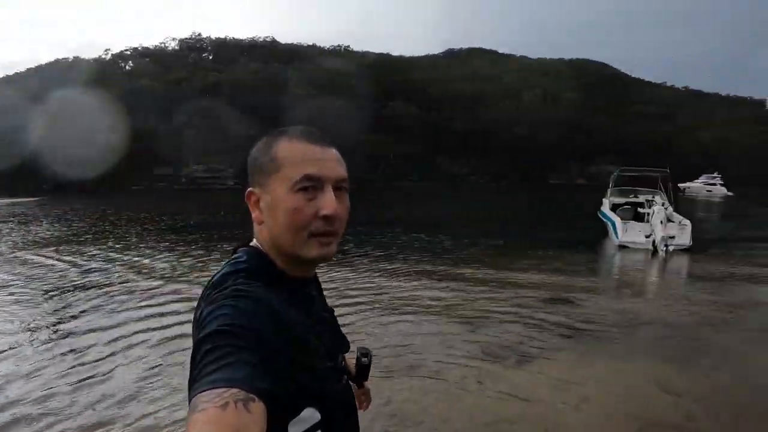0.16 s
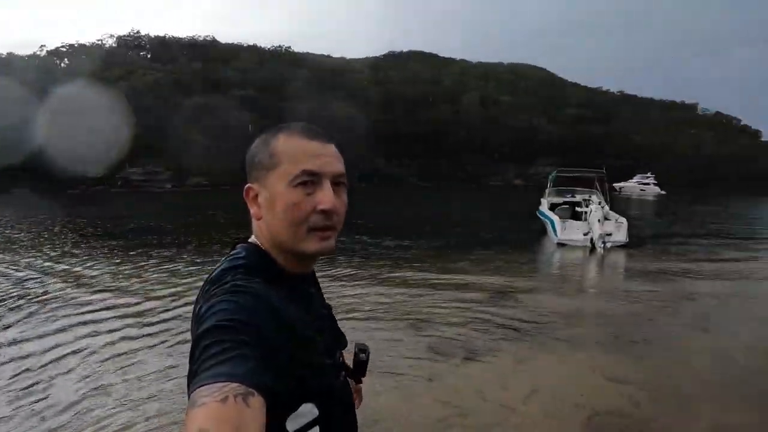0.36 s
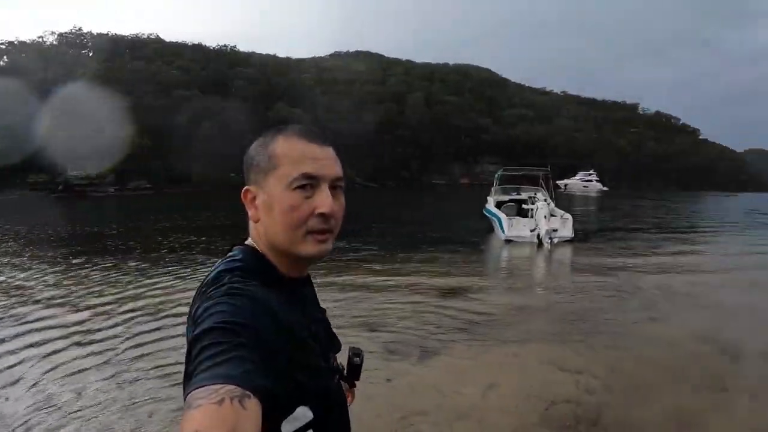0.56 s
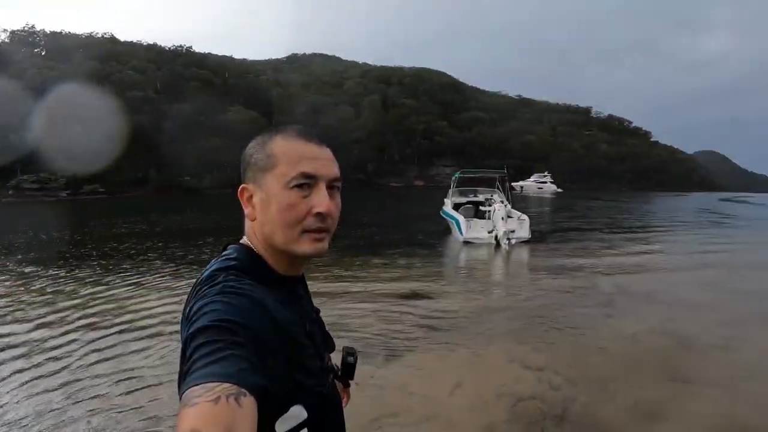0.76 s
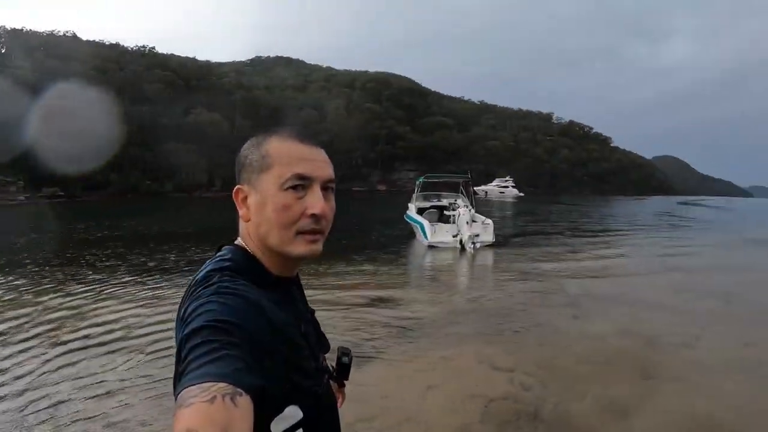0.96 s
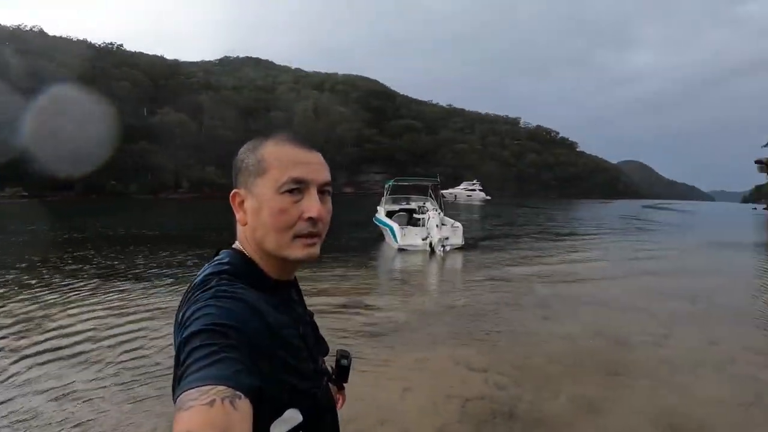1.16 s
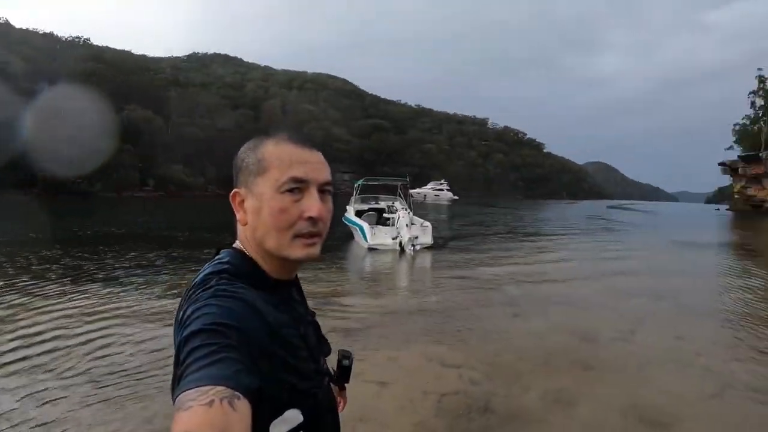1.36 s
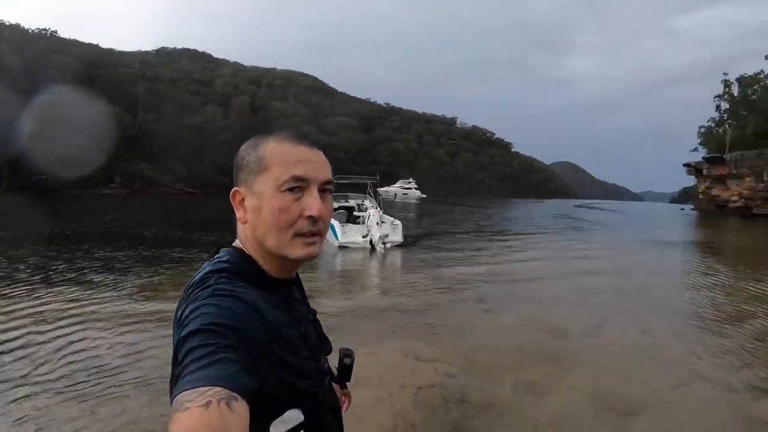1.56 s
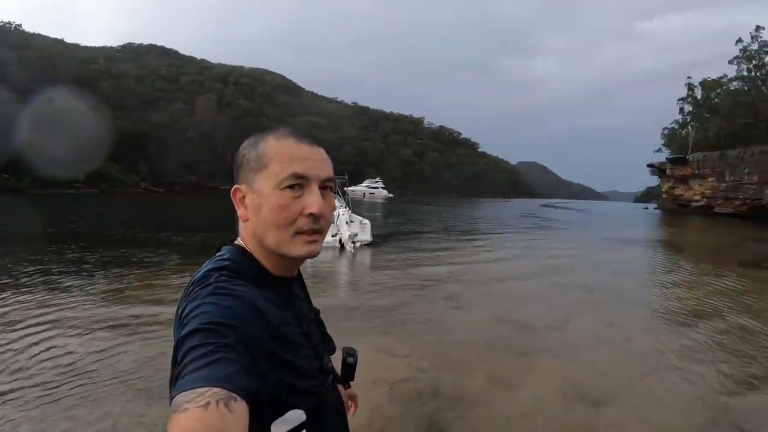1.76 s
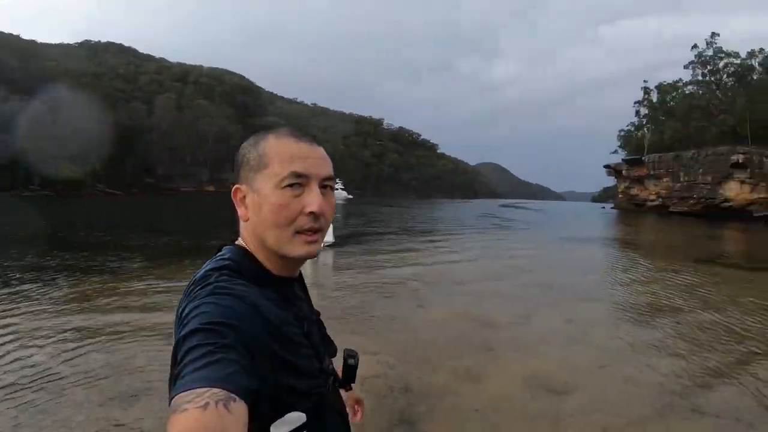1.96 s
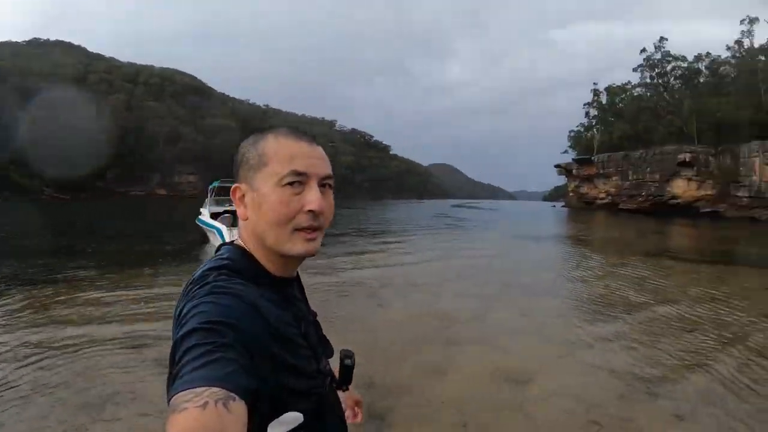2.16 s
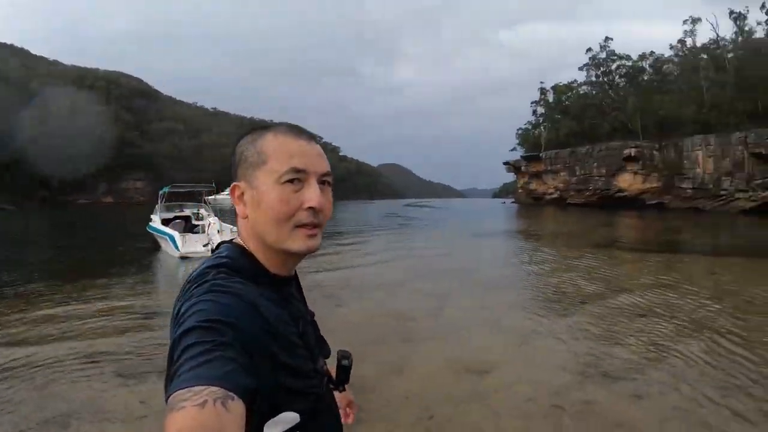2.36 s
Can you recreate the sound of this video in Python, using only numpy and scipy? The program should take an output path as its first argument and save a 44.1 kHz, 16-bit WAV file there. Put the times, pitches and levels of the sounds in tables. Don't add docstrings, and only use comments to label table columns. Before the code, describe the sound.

Close handheld microphone in a calm bay: bubbly water stir, a heavy wind knock with brief rattle, a quiet lull, a sharp splashy step with plops and ticks, then low wind bumps and last drops.

```python
import sys
import numpy as np
from scipy import signal
from scipy.io import wavfile
from scipy.ndimage import uniform_filter1d

SR = 44100
rng = np.random.default_rng(int(sys.argv[2]) if len(sys.argv) > 2 else 0)


def attenuation_scalar(level_db):
    decades = np.asarray(level_db, float) / 20
    return 10 ** decades


def output_pcm(signal):
    pcm = np.clip(np.atleast_2d(signal).T, -1, 1) * 32767
    wavfile.write(sys.argv[1], SR, np.round(pcm).astype(np.int16))


N = 110250

# (frequency [Hz], level [dB])
HUSH_SPECTRUM = [(59, -27.5), (100, 8), (205, -7.5), (825, -20.5), (976, -16.5), (3180, -25), (5170, -36.5),
                 (7560, -27.5), (15500, -49.5)]
# (frequency [Hz], left-right likeness [0-1])
HUSH_LIKENESS = [(100, 0.89), (400, 0.83), (3000, 0.13)]
# (frequency [Hz], left over right [dB])
HUSH_BALANCE = [(200, -0.5), (1000, -0.5), (5000, 5)]
# (time [s], level [dB])
STIR = [(0, -33), (.17, -35), (.2, -43), (.33, -49), (.42, -62), (1.2, -62.5), (1.27, -47), (1.37, -47),
        (1.62, -48), (1.68, -56.5), (2.27, -63.5), (2.4, -55.5), (2.5, -47)]
# (frequency [Hz], level [dB])
SWARM_SPECTRUM = [(240, -53), (400, -33), (588, -2.5), (1310, -0.5), (2520, -5), (4800, -13), (6240, -48),
                  (10600, -120)]
SPRAY_SPECTRUM = [(1470, -41), (2500, 4), (3070, -17), (4140, 8), (5040, -27), (6540, 3), (9800, -6),
                  (13700, -12), (15500, -38)]
FOAM_SPECTRUM = [(180, -53), (300, -9.5), (384, -28), (590, -23), (863, -13.5), (2440, -5), (5390, -20.5),
                 (7620, -21), (15500, -47)]
# (time [s], level [dB])
GUST = [(0, -48), (.18, -41.5), (.26, -18.5), (.31, -35), (.45, -35), (.52, -38.5), (1.2, -51.5),
        (1.4, -42), (1.57, -27.5), (1.66, -32), (1.75, -34.5), (1.83, -36), (1.89, -29.5), (1.97, -36.5),
        (2.06, -30), (2.16, -26), (2.26, -31.5), (2.36, -39)]
# (frequency [Hz], level [dB])
RUMBLE_SPECTRUM = [(7.1, -10), (12, 23.5), (32, -4), (82, -7.5), (219, -16.5), (254, -67), (400, -78),
                   (520, -71), (880, -120)]
# (time [s], peak [dB], pitch [Hz], 60 dB decay [s])
PLOPS = [(0.325, -36, 1730, 0.022), (0.455, -45.5, 2220, 0.043), (.758, -49, 2880, 0.02),
         (0.78, -38, 2720, 0.025), (0.86, -35, 1820, 0.008), (1.014, -39.5, 1970, 0.013),
         (1.187, -36.5, 2450, .02), (1.244, -37, 2350, 0.014), (1.262, -37, 2220, 0.025),
         (1.272, -40, 2550, 0.019), (1.288, -28.5, 2190, 0.02), (1.316, -37.5, 1510, 0.094),
         (1.36, -19, 1823, 0.029), (1.374, -27.5, 1420, 0.054), (1.411, -6, 1530, 0.014),
         (1.466, -31, 1950, 0.023), (1.57, -14, 2370, 0.03), (1.578, -23.5, 903, 0.042),
         (1.604, -31, 2280, 0.03), (1.635, -33, 1250, 0.045), (1.703, -37.5, 1767, 0.038),
         (2.427, -33, 342, 0.17), (2.463, -39.5, 1770, 0.06), (.296, -33, 2760, 0.044),
         (1.01, -38.5, 204, 0.34), (.003, -28, 655, 0.041), (.047, -23, 2450, 0.014),
         (.053, -27.5, 2380, 0.09), (.121, -29, 2140, 0.036), (.147, -28, 2340, .03),
         (.256, -30, 3230, 0.028), (1.547, -46, 2800, 0.036), (1.722, -38.5, 2570, 0.024),
         (2.137, -46, 2720, .02), (2.144, -47, 3370, .02), (2.281, -44, 2700, 0.011),
         (2.337, -45.5, 765, .06), (2.379, -39, 1660, .02), (2.38, -45, 736, 0.083),
         (2.425, -40, 1830, 0.033), (2.444, -42, 1800, 0.032), (2.45, -43.5, 887, 0.06),
         (2.481, -37, 770, 0.086), (2.495, -31, 2070, 0.049)]
# (time [s], peak [dB], ring [Hz])
TICKS = [(0.0571, -30, 7640), (0.1063, -45, 5900), (0.1358, -32.5, 4970), (0.1603, -38, 7480),
         (0.2525, -34, 7450), (0.8592, -53, 7350), (1.0141, -53, 7300), (1.1867, -51, 10500),
         (1.2897, -24, 8220), (1.32, -37, 7600), (1.3574, -14.5, 6570), (1.3672, -27, 7500),
         (1.3745, -27, 6100), (1.451, -31.5, 8050), (1.482, -39, 9330), (1.5274, -50, 8450),
         (1.5402, -44.5, 10600), (1.5552, -33.5, 8040), (1.578, -27.5, 7300), (1.714, -41.5, 7240),
         (1.745, -43, 10500), (1.918, -37, 7800), (.004, -31.5, 8200), (.066, -33, 7500),
         (.1241, -37, 6960), (0.195, -40, 6550), (.2104, -47, 10200), (.2718, -38, 8900),
         (0.168, -33, 4370), (0.782, -49, 4000), (.8592, -39.5, 3500), (1.0145, -39, 3230),
         (1.068, -54, 10400), (1.244, -49, 3540), (1.256, -47, 8950), (1.3079, -47, 10800),
         (1.3574, -53, 12500), (1.3725, -37, 11900), (1.3865, -42, 10100), (1.4155, -33.5, 3300),
         (1.433, -47, 10600), (1.476, -51, 11000), (1.5547, -44, 3750), (1.562, -38, 7040),
         (1.572, -38, 9200), (1.733, -48, 11000), (1.752, -44, 5800), (1.816, -45, 4230),
         (1.854, -47, 4200), (1.9805, -50, 9400), (2.445, -46, 3680), (2.47, -53, 3600)]
# (time [s], length [s], level [dB], start [Hz], end [Hz])
CHIRPS = [(0.011, 0.054, -35, 1623, 1696), (0.062, 0.02, -27, 1160, 1430),
          (0.165, 0.0095, -25.5, 1720, 1950), (1.361, 0.017, -24, 1830, 2280), (1.4, 0.011, -32, 820, 990),
          (1.415, 0.028, -39, 800, 754), (1.429, 0.016, -29, 970, 1920), (1.449, 0.017, -33.5, 1805, 1880),
          (1.495, 0.023, -39, 1240, 1590), (1.511, 0.0066, -38, 1990, 2490),
          (1.572, 0.012, -31.5, 3220, 3600), (2.2724, 0.0097, -35, 1825, 2130),
          (2.351, 0.014, -44, 1780, 3230), (2.401, 0.037, -43.5, 590, 880), (1.356, .012, -18, 1353, 1520),
          (1.557, 0.012, -20, 2540, 1990), (1.562, .019, -21.5, 1470, 1940),
          (2.288, 0.0048, -24, 1770, 2060), (1.494, 0.0094, -37, 1750, 1840),
          (2.344, 0.039, -47, 1112, 905), (2.328, 0.023, -48.5, 2000, 2250)]
# (time [s], peak [dB], swing [Hz])
THUMPS = [(0.262, -6, 34.7), (0.256, -16.5, 135.6), (.436, -22.5, 49.2), (.458, -27, 94), (.49, -31, 39.3),
          (1.076, -34.5, 21.7), (1.565, -19, 43.5), (2.104, -21, 31.5), (1.653, -24.5, 24.2),
          (1.748, -23, 46), (1.83, -26.5, 21.8), (1.892, -25, 37), (2.043, -25.5, 40), (2.073, -22.5, 43),
          (2.242, -22, 40.5), (2.141, -21.5, 70), (2.152, -20, 75), (2.166, -20, 82.5)]
# (time [s], pitch [Hz], level [dB])
WHISTLE = [
    (2.15, 1950, -59),
    (2.19, 2500, -51),
    (2.21, 2800, -70),
    (2.222, 3480, -51),
    (2.234, 4150, -54),
    (2.243, 5200, -72),
    (2.252, 6100, -62),
    (2.28, 7250, -68),
    (2.34, 7500, -72),
]

HUSH_DB = -48
SWARM_PER_S, SWARM_SPREAD_DB, SWARM_DB = 900, 4.5, 0.5
SPRAY_PER_S, SPRAY_SPREAD_DB, SPRAY_DB = 1100, 7.5, -11.5
FOAM_DB, WATER_PAN_DB = -4.5, 2
RISE_S = 0.00021
PLOP_GLIDE = 0.047
PINCH, PINCH_S = 0.34, 0.0008
TICK_CYCLES, TICK_SNAP_DB = 22, -1.5
GUST_PAN_DB, GUST_LIKENESS = -3.5, 0.93
THUMP_TURNS, THUMP_PAN_DB = 0.61, -6.5
RATTLE_DB, RATTLE_S = -33, 0.021
EDGE_HZ = 15500


def evened(x):
    return x / np.sqrt(np.mean(x ** 2) + 1e-20)


def read(points, hz):
    f, value = np.transpose(points)
    return np.interp(np.log(hz + 1), np.log(f + 1), value)


def curve(points):
    s, value = np.transpose(points)
    return np.interp(np.arange(N) / SR, s, value)


def add(mix, s, sound):
    part = mix[..., round(s * SR):][..., :sound.shape[-1]]
    part += sound[..., :part.shape[-1]]


def pan(x, db):
    return x * attenuation_scalar(np.array([[db / 2], [-db / 2]]))


def sweep(hz):
    return np.sin(2 * np.pi * np.cumsum(hz) / SR)


def colour(points):
    gain = read(points, np.fft.rfftfreq(4096, 1 / SR)) * np.log(10) / 20
    full = np.concatenate([gain, gain[-2:0:-1]])
    return np.fft.ifft(np.exp(np.conj(signal.hilbert(full)))).real[:2048]


def noise(points, likeness, balance, patchy_db, size):
    frames, hz = 4 * N // size + 5, np.fft.rfftfreq(size, 1 / SR)
    a, b, c, d, patches = rng.standard_normal((frames, len(hz), 5)).T
    patches = uniform_filter1d(patches, size=6, axis=0)
    patches = evened(uniform_filter1d(patches, size=8, axis=1))
    like = np.clip(read(likeness, hz), -1, 1)[:, None]
    lean = attenuation_scalar(read(balance, hz) / 2)[:, None]
    left = a + 1j * b
    right = like * left + np.sqrt(1 - like ** 2) * (c + 1j * d)
    z = np.array([left * lean, right / lean])
    z *= attenuation_scalar(read(points, hz)[:, None] + patchy_db * patches)
    return evened(signal.istft(z, nperseg=size, noverlap=size * 3 // 4)[1][:, :N])


def bubble(hz, t60, glide, pinch=0.):
    t = np.arange(0, t60, 1 / SR)
    turns = hz * (t + glide * t ** 2 + pinch * PINCH_S * (1 - np.exp(-t / PINCH_S)))
    onset = (1 - np.exp(-t / max(RISE_S, .5 / hz))) ** 2
    return onset * attenuation_scalar(-60 * t / t60) * np.sin(2 * np.pi * turns)


def speck(hz, cycles, chance):
    ring = bubble(hz, cycles / hz, 0)
    ring = ring * (1 + 0.49 * uniform_filter1d(chance, size=6)[:len(ring)])
    return ring / abs(ring).max()


def sparse(per_s, spread_db):
    size = attenuation_scalar(spread_db * np.minimum(rng.exponential(1, N), 3.))
    return size * (rng.random(N) < per_s / SR) * rng.choice([-1, 1], N)


def flutter():
    drift = uniform_filter1d(rng.standard_normal(N), size=50)
    return attenuation_scalar(1.5 * evened(uniform_filter1d(drift, size=50)))


def hush():
    return attenuation_scalar(HUSH_DB) * noise(HUSH_SPECTRUM, HUSH_LIKENESS, HUSH_BALANCE, 3.4, size=512)


def swarm():
    hits, kind, out = sparse(SWARM_PER_S, SWARM_SPREAD_DB), rng.integers(0, 36, N), np.zeros((2, N))
    for k, hz in enumerate(np.geomspace(520, 3900, 36)):
        cycles, glide, side = rng.random(3)
        t60 = (16 + 34 * cycles) / hz
        ring = signal.oaconvolve(hits * (kind == k), bubble(hz, t60, 0.14 * glide / t60))[:N]
        level = attenuation_scalar(read(SWARM_SPECTRUM, hz)) * hz ** 1.11
        out += pan(level * ring, WATER_PAN_DB + 11.0 * (side - .5))
    return evened(out)


def spray():
    hits, kind, out = sparse(SPRAY_PER_S, SPRAY_SPREAD_DB), rng.integers(0, 12, N), np.zeros((2, N))
    for k, hz in enumerate(np.geomspace(3600, 11500, num=12)):
        ring = signal.oaconvolve(hits * (kind == k), speck(hz, 12., rng.standard_normal(600)))[:N]
        out += pan(attenuation_scalar(read(SPRAY_SPECTRUM, hz)) * ring, 1.5 + 5.0 * (rng.random() - .5))
    return evened(out)


def foam():
    likeness = [(500, 1.0), (4000, 0.59), (14000, 0.74)]
    return noise(FOAM_SPECTRUM, likeness, [(500, 0.64), (8000, 0.72)], 3.2, size=256)


def slosh():
    water = attenuation_scalar(SWARM_DB) * swarm() + attenuation_scalar(SPRAY_DB) * spray() + attenuation_scalar(FOAM_DB) * foam()
    return attenuation_scalar(curve(STIR)) * water


def gusts():
    spectrum = RUMBLE_SPECTRUM + [(800, -93)]
    rumble = noise(spectrum, [(50, GUST_LIKENESS)], [(50, GUST_PAN_DB)], 3.38, size=2048)
    return attenuation_scalar(curve(GUST) + 1.5) * rumble


def plops():
    out = np.zeros(N)
    for s, db, hz, t60 in PLOPS:
        ring = bubble(hz, t60, PLOP_GLIDE / t60, PINCH)
        add(out, s, attenuation_scalar(db) * ring / abs(ring).max())
    return out


def ticks():
    out, snap = np.zeros((2, N)), colour(SPRAY_SPECTRUM)
    snap = snap / abs(snap).max()
    for s, db, hz in TICKS:
        chance = rng.standard_normal(600)
        pan_db = 6.5 + 0.75 * chance[0] + hz / 4000
        add(out, s, pan(attenuation_scalar(db) * speck(hz, TICK_CYCLES, chance), pan_db))
        add(out, s, pan(attenuation_scalar(db + TICK_SNAP_DB) * snap, pan_db))
    t = np.arange(SR // 20) / SR
    scatter = rng.standard_normal((2, len(t))) * attenuation_scalar(-60 * t / 0.04)
    return out + attenuation_scalar(-28) * signal.oaconvolve(out, scatter, axes=1)[:, :N]


def chirps():
    out = np.zeros(N)
    for s, length, db, hz0, hz1 in CHIRPS:
        u = np.arange(0, length, 1 / SR) / length
        swell = np.sin(np.pi * u ** 0.48)
        add(out, s, attenuation_scalar(db) * swell * sweep(hz0 + (hz1 - hz0) * u))
    return out


def thumps():
    out, t = np.zeros((2, N)), np.arange(N) / SR
    for s, db, hz in THUMPS:
        swell = np.exp(-((t - s) * hz / THUMP_TURNS) ** 2)
        out -= pan(attenuation_scalar(db) * swell * np.cos(2 * np.pi * hz * (t - s)), THUMP_PAN_DB)
    return out


def rattle():
    late = np.arange(N) / SR - THUMPS[0][0] + 0.013
    shake = (late > 0) * np.exp(-(late / RATTLE_S / 2) ** 2)
    return attenuation_scalar(RATTLE_DB) * shake * noise(FOAM_SPECTRUM, [(500, 0.83)], [(500, 0.73)], 7.9, size=128)


def whistle():
    out = np.zeros(N)
    s, hz, db = np.transpose(WHISTLE)
    t = np.arange(s[0], s[-1], 1 / SR)
    breath = 1 + 0.43 * evened(uniform_filter1d(rng.standard_normal(len(t)), size=120))
    add(out, s[0], breath * attenuation_scalar(np.interp(t, s, db)) * sweep(np.interp(t, s, hz)))
    return out


def scene():
    drops = pan((plops() + chirps() + whistle()) * flutter(), 2.5)
    wind = gusts() + thumps() + rattle()
    return hush() + slosh() + drops + ticks() + wind


def band_limit(x):
    return signal.sosfilt(signal.butter(12, 15640, fs=SR, output="sos"), x)


def record(dry):
    lowpass = signal.firwin(numtaps=127, cutoff=EDGE_HZ, fs=SR)
    mix = signal.oaconvolve(dry, lowpass[None], "same")
    return band_limit(mix)


dry = scene()
out = record(dry)
output_pcm(out)
```